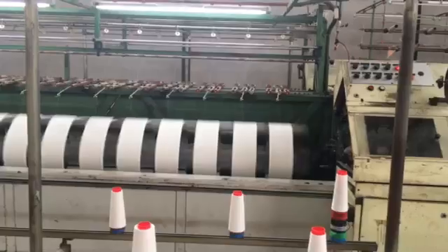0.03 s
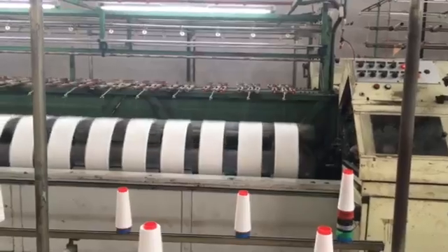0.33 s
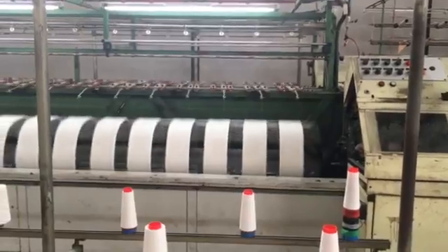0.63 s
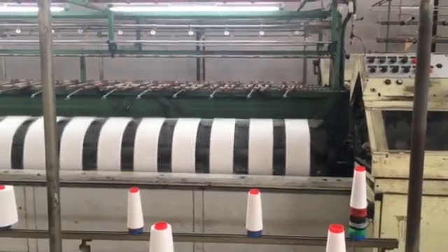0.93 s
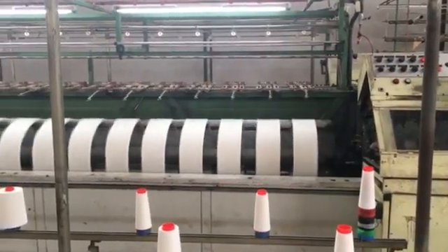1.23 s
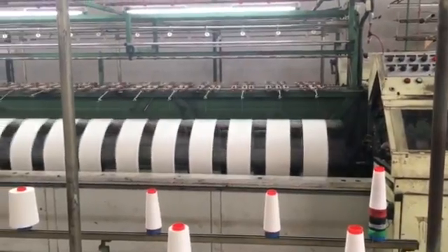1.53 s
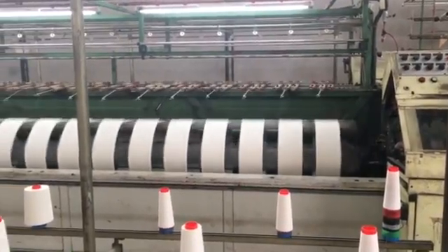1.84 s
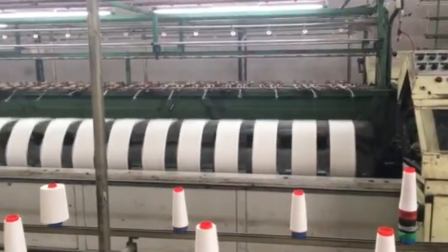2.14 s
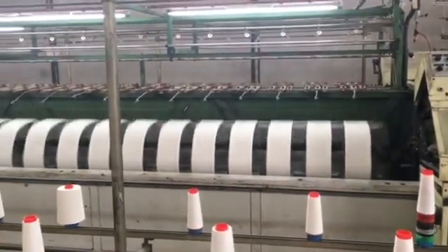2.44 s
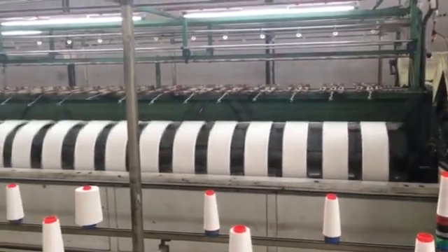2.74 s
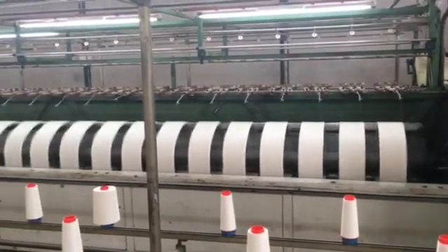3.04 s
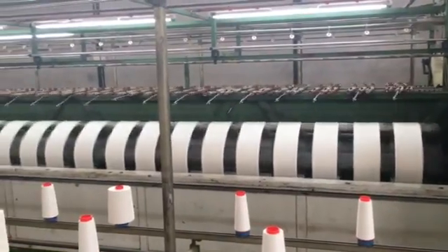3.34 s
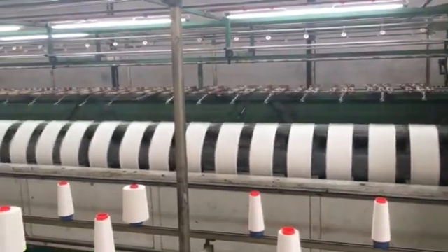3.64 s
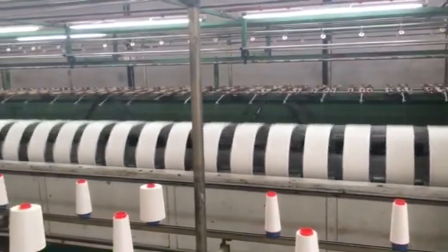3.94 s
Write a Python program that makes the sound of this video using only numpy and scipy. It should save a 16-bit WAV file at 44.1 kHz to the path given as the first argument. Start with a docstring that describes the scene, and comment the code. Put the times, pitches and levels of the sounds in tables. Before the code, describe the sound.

A yarn reeling machine runs steadily for the whole four seconds, a couple of metres away. Its motor hums, while a pulsing gear whine and short high squeaks repeat about five times a second over ringing steel. Yarn hisses and ticks finely. Dull lever knocks come at about 0.4, 1, 1.7 and 2 seconds. Other machines in the factory hall roar and rattle densely throughout.

```python
"""Yarn reeling machine in a factory hall

The machine runs steadily a couple of metres away, heard in mono. Its drive hums and a gear whines
in pulses. On every turn of the reel the steel frame rings and the same dry spots squeak.
Yarn hisses through ticking guides and levers give a few dull knocks, while the other
machines in the hall roar and rattle."""
import sys
import numpy as np
from scipy import signal
from scipy.fft import rfft, irfft
from scipy.io import wavfile
from scipy.ndimage import uniform_filter1d

SR = 44100
rng = np.random.default_rng(int(sys.argv[2]) if len(sys.argv) > 2 else 0)


def pcm_store(signal):
    """Save signal as 16-bit PCM."""
    levels = np.round(np.clip(np.atleast_2d(signal), -1, 1) * 32767)
    wavfile.write(sys.argv[1], SR, levels.astype(np.int16).T)


N = 176400
TURN_S = .19645  # one turn of the reel


def undb(db):
    """Turn decibels into a factor to multiply by."""
    return 10 ** (np.asarray(db) / 20)


def level(x, db):
    """Set a sound's average (rms) level."""
    return x * undb(db) / np.sqrt(np.mean(x ** 2))


def gain(curve):
    """A volume that follows (t/s, level/dB) points."""
    return undb(np.interp(np.arange(N) / SR, *np.array(curve).T))


def walk(rate):
    """A smooth random wobble of size about 1, with `rate` new values a second."""
    hold = int(SR / rate)
    steps = np.repeat(rng.standard_normal(N // hold + 1), hold)
    return 1.246 * uniform_filter1d(uniform_filter1d(steps, hold), hold)[:N]


def tone(hz, drift_hz, rate=8):
    """A pure tone of rms 1 whose pitch wanders slightly."""
    cycles = np.cumsum(hz + drift_hz * walk(rate)) / SR
    return np.sqrt(2) * np.sin(2 * np.pi * (cycles + rng.random()))


def colour(x, points):
    """Shape a sound's bass and treble along (f/Hz, level/dB) points."""
    hz, db = np.array(points).T
    f = np.maximum(np.fft.rfftfreq(N, 1 / SR), 1)
    response = undb(np.interp(np.log(f), np.log(hz), db))
    cepstrum = irfft(np.log(response), N)
    cepstrum[1:N // 2] *= 2  # folded so the filter rings after a blow, not before
    cepstrum[N // 2 + 1:] = 0
    return irfft(rfft(x) * np.exp(rfft(cepstrum)), N)


def flicker(x, depth_db, rate, count=9):
    """Let each octave of a sound flutter on its own."""
    f = np.maximum(np.fft.rfftfreq(N, 1 / SR), 1)
    octave = np.clip(np.log2(f / 50), 0, count - 1)
    spectrum = rfft(x)
    bands = (irfft(spectrum * np.maximum(1 - abs(octave - k), 0), N) for k in range(count))
    return sum(band * undb(depth_db * walk(rate)) for band in bands)


def impacts(per_s, spread_db, decay_s):
    """Small blows at random times, each a fading burst of noise."""
    hits = rng.random(N) < per_s / SR
    blows = hits * undb(spread_db * np.clip(rng.standard_normal(N), -2, 2))
    energy = signal.lfilter([1], [1, -np.exp(-2 / (decay_s * SR))], blows ** 2 + 1e-18)
    return np.sqrt(energy) * rng.standard_normal(N)


def resonate(x, hz, width):
    """Make a sound ring in a narrow band around one pitch."""
    b, a = signal.iirpeak(hz, hz / width / 2, fs=SR)
    return signal.lfilter(b, a, signal.lfilter(b, a, x))


def add(out, x, start_s):
    """Mix a sound in at a given time."""
    i = int(start_s * SR)
    if 0 <= i < N:
        out[i:i + len(x)] += x[:N - i]


def drive():
    """The motor drones, a shaft flutters, and weaker tones waver with the load."""
    # Loudness of the motor's drone: t/s, relative level/dB
    motor_curve = [(0.1, -34.5), (0.81, -33.5), (0.83, -41), (1.04, -30), (1.1, -37), (1.21, -30.5),
                   (1.38, -36.5), (1.41, -31.5), (2.25, -34), (2.49, -29.5), (2.61, -39), (2.67, -33),
                   (3.41, -34.5), (3.43, -42), (3.53, -31.5), (4.0, -32)]
    # Loudness of the shaft's tone: t/s, relative level/dB
    shaft_curve = [(.1, 0), (.5, -8), (.75, 3.5), (1.1, -3), (1.5, 6.5), (2.05, -2), (2.55, 7), (3.1, 0),
                   (3.5, 3), (4, 0)]
    # Weaker tones of the drive: f/Hz, level/dB
    hum_tones = [(70.2, -45), (185.2, -43.5), (221.8, -44), (300.5, -45.5), (421, -56), (468.2, -46.5),
                 (515.3, -47), (542, -50.5), (796.5, -49.5), (983, -49.5), (1073, -48.5), (1297, -53)]
    motor = tone(hz=140.2, drift_hz=1.12) * gain(motor_curve) * undb(.14)
    shaft = tone(hz=374.3, drift_hz=7, rate=60) * undb(4 * walk(35))
    shaft = level(shaft, -43.5) * gain(shaft_curve)
    hum = sum(level(tone(hz, drift_hz=1.12) * undb(4.5 * walk(9)), db) for hz, db in hum_tones)
    return motor + shaft + hum


def gear():
    """A gear whines; tight spots swell the tone and bend its pitch the same way on every turn."""
    # Tight spots of the gear: t/s within one turn, half width/s, f/Hz, relative level/dB
    tight_spots = [(.141, .005, 1459, -31.9), (.160, .0055, 1472, -35.3), (.175, .0045, 1455, -32.5),
                   (.187, .004, 1442, -39), (.216, .0045, 1478, -32.7), (.240, .007, 1462, -32),
                   (.262, .007, 1454, -36.8), (.286, .005, 1442, -32.4), (.301, .004, 1463, -32.4),
                   (.312, .005, 1452, -38)]
    # Loudness of the whine: t/s, relative level/dB
    whine_curve = [(.1, 2), (.5, -2), (1.2, -1), (1.7, .8), (2.3, 1), (2.8, 0), (3.3, 0.2), (4, .5)]
    when, width, hz, db = np.array(tight_spots).T[:, :, None]
    from_spot_s = (np.arange(N) / SR - when + TURN_S / 2) % TURN_S - TURN_S / 2
    swells = undb(db) * np.exp(-(from_spot_s / width) ** 2 / 2)
    pitch = np.average(np.broadcast_to(hz, swells.shape), weights=swells ** 2, axis=0)
    whine = tone(pitch, drift_hz=1) * np.linalg.norm(swells, axis=0)
    return whine * gain(whine_curve) * undb(1.5 * walk(20))


def yarn():
    """Threads hiss off their cones and tick against the guides."""
    # Tone colour of the yarn and its guides: f/Hz, relative level/dB
    yarn_colour = [(1000, -19.5), (2200, -0.5), (2700, -5), (3300, 2), (4300, -1.5), (5000, -4), (6100, -4),
                   (7500, -8.5), (9800, -9.5), (11000, -23.5)]
    # Loudness of the hiss and ticks: t/s, relative level/dB
    yarn_curve = [(.08, -3), (.39, -6), (.44, -0.5), (.52, -2), (.65, 1), (1.8, .6), (2.6, 1), (4, 1)]
    hiss = flicker(colour(rng.standard_normal(N), yarn_colour), depth_db=1.5, rate=60)
    ticks = colour(impacts(per_s=330, spread_db=0, decay_s=.00072), yarn_colour)
    return (level(hiss, -37) + level(ticks, -49)) * gain(yarn_curve)


def machines():
    """The other machines blend into a roar, with spindles and levers rattling closer by."""
    # Tone colour of the hall's roar: f/Hz, relative level/dB
    roar_colour = [(20, -29.5), (36, -16.5), (52, -3), (68, -2.5), (115, 4), (175, -1.5), (340, -2),
                   (460, -6.5), (640, -4.5), (800, -7.5), (1050, -5.5), (1450, -5), (1800, -8.5),
                   (2200, -13), (2700, -16.5), (4000, -26.5), (10000, -37)]
    # Tone colour of the spindles and levers: f/Hz, relative level/dB
    rattle_colour = [(100, -15), (260, 5), (500, -1.5), (850, -5), (1400, 0.5), (2000, -1.5), (2700, -17.5),
                     (3400, -14), (6000, -27)]
    roar = flicker(colour(rng.standard_normal(N), roar_colour), depth_db=1.77, rate=30)
    roar *= undb(-.3 * walk(8.4))  # slight swells
    rattle = colour(impacts(per_s=130, spread_db=3.5, decay_s=.003), rattle_colour)
    return level(roar, db=-27.5) + level(rattle, db=-36)


def frame():
    """Scraping that partly repeats with each turn keeps the steel frame ringing."""
    # Ringing notes of the frame: f/Hz, rough width/Hz, relative level/dB
    notes = [(1485, 70, -47.5), (1600, 110, -45), (1938, 40, -44.5), (2455, 35, -50), (3062, 35, -51.5),
             (3430, 220, -48), (3895, 22, -55), (4370, 110, -52), (5900, 80, -55.5), (6160, 70, -57)]
    repeat_share = .44
    repeating = np.resize(rng.standard_normal(int(TURN_S * SR)), N)
    scrape = np.sqrt(repeat_share) * repeating + np.sqrt(1 - repeat_share) * rng.standard_normal(N)
    return sum(level(resonate(scrape, hz, width), db + 1) for hz, width, db in notes)


def squeak(middle_s, length_s, hz, glide, db):
    """One dry spot rubs and gives a short squeal on every turn, never quite alike."""
    scatter_db, detune, jitter_s = 1.3, .0018, .00005
    out, grit = np.zeros(N), walk(400)
    turns = np.arange(-1, N / SR / TURN_S)
    t = np.arange(-length_s / 2, length_s / 2, 1 / SR)
    fade = np.cos(np.pi * t / length_s)
    for turn, (louder, higher, later) in zip(turns, rng.standard_normal((len(turns), 3))):
        phase = 2 * np.pi * (hz * (1 + detune * higher) * t + glide * t ** 2 / 2)
        roughness = .2 * grit[rng.integers(N // 2):][:len(t)]
        squeal = np.sqrt(2) * np.sin(phase + roughness) * fade * undb(db + scatter_db * louder)
        add(out, squeal, middle_s + turn * TURN_S + jitter_s * later - length_s / 2)
    return out


def squeaks():
    """All the reel's dry spots squeak; one chirps, gripping harder in some turns than in others."""
    # Dry spots: t/s within one turn, length/s, f/Hz, glide/(Hz per s), relative level/dB
    dry_spots = [(.187, .024, 1942, -1000, -31.8), (.205, .029, 1955, 3300, -28.2),
                 (.200, .025, 3897, 0, -38), (.250, .05, 1942, -300, -38.5), (.280, .026, 1920, -1500, -40),
                 (.155, .028, 1932, 0, -39.5), (.304, .016, 1950, 0, -38.5), (.294, .018, 2445, 0, -42.5),
                 (.124, .022, 3090, 0, -39.8), (.178, .028, 3070, 0, -43), (.294, .016, 3110, 0, -43),
                 (.156, .014, 3110, 0, -44.5), (.208, .015, 3440, 0, -42), (.178, .013, 3420, 0, -42.5),
                 (.228, .03, 3900, 0, -46.5), (.227, .018, 4340, 0, -45), (.150, .032, 6160, 0, -50),
                 (.297, .014, 6160, 0, -49)]
    # Loudness of their squeaks: t/s, relative level/dB
    squeak_curve = [(.2, 2), (.5, 0), (1, -2), (1.3, .7), (2, .3), (2.3, -1), (2.9, -.3), (3.25, -2),
                    (3.55, -.3), (4, -.7)]
    # The chirping spot: t/s, length/s, f/Hz, glide/(Hz per s), relative level/dB
    chirp_spot = (.144, .027, 2464, 0, -37.5)
    # Loudness of its chirp: t/s, relative level/dB
    chirp_curve = [(.14, 1), (.34, -8), (.54, -2), (.73, -1), (.93, 6), (1.13, 7.5), (1.4, 0), (1.72, 3),
                   (2, -.5), (2.3, 1.5), (3.1, .5), (3.3, -4), (4, -2)]
    squeals = sum(squeak(*spot) for spot in dry_spots) * gain(squeak_curve)
    return squeals + squeak(*chirp_spot) * gain(chirp_curve)


def knocks():
    """Levers strike dull blows on the casing."""
    # Blows of the levers: t/s, level/dB
    blows = [(0.419, -25.5), (1.006, -27.5), (1.655, -27.5), (2.03, -29.5)]
    rise_s, decay_s = .0015, .032
    loudness, t = np.zeros(N), np.arange(SR // 4) / SR
    for start, db in blows:
        add(loudness, undb(db) * np.exp(-t / decay_s) * np.minimum(t / rise_s, 1), start)
    casing = resonate(rng.standard_normal(N), hz=255, width=56)
    return loudness * level(casing, 0)


def hall(x):
    """Add the hall's blurred echo to a sound."""
    echo_db, fade_s = -9, .74  # fade_s: time to die away by 60 dB
    tail = rng.standard_normal(SR) * np.exp(-np.log(1000) * np.arange(SR) / SR / fade_s)
    return x + undb(echo_db) * signal.fftconvolve(x, tail / np.linalg.norm(tail))[:N]


def scene():
    """All the sounds together, the same in both ears; only squeaks and knocks echo."""
    mono = hall(squeaks() + knocks()) + frame() + drive() + gear() + yarn() + machines()
    return np.array([mono, mono])


def record(dry):
    """Start the sound after a brief silence and cut off the highest treble."""
    start_s, top_hz = .083, 10300
    fade_in = np.clip((np.arange(N) / SR - start_s) / .002, 0, 1)
    treble_cut = signal.ellip(12, .2, 80, top_hz, fs=SR, output="sos")
    return signal.sosfilt(treble_cut, dry * fade_in)


dry = scene()
out = record(dry)
pcm_store(out)
```